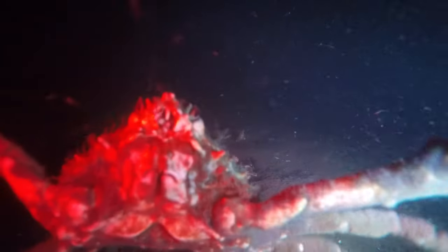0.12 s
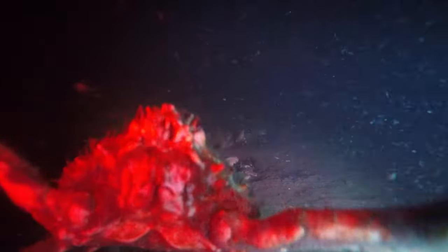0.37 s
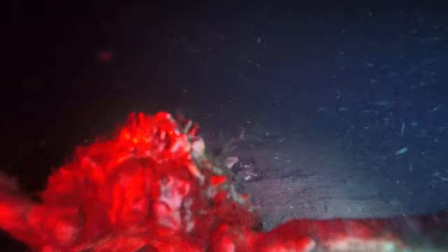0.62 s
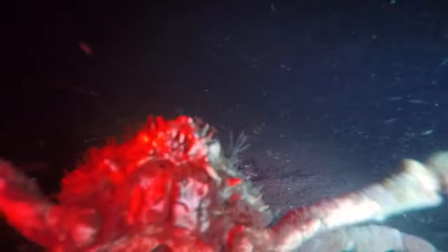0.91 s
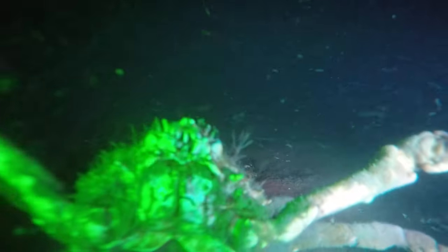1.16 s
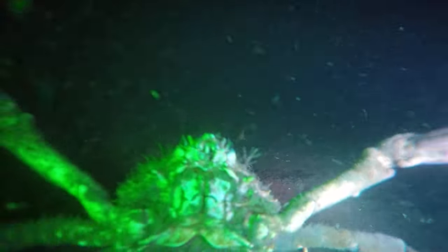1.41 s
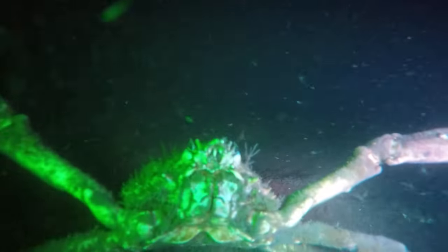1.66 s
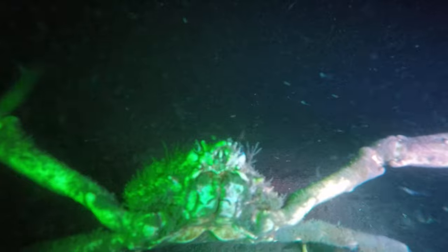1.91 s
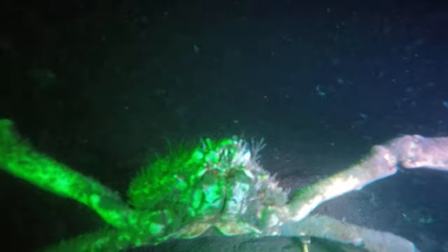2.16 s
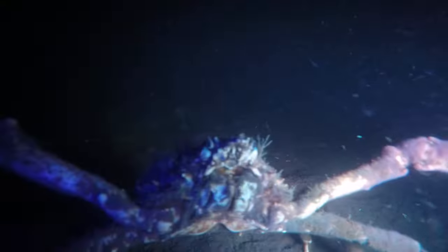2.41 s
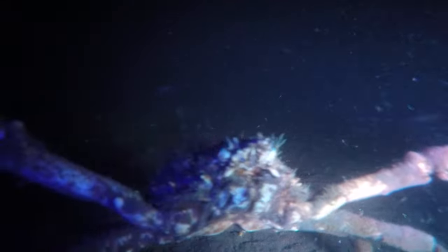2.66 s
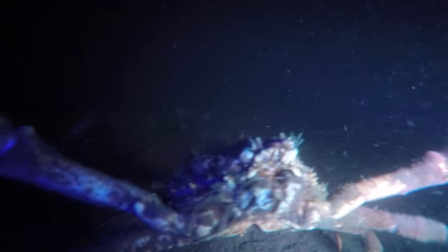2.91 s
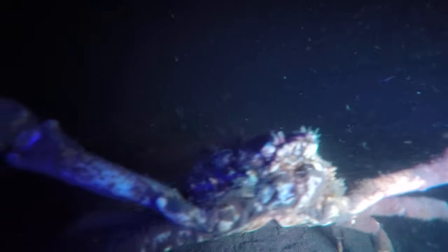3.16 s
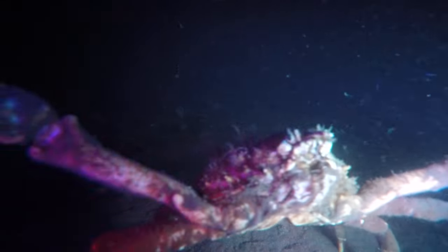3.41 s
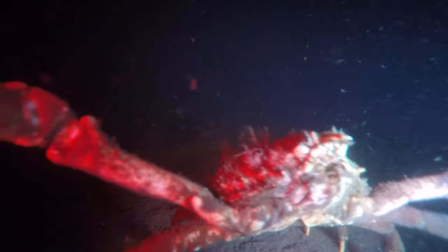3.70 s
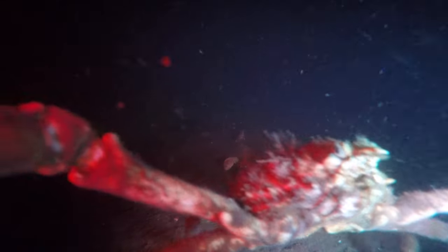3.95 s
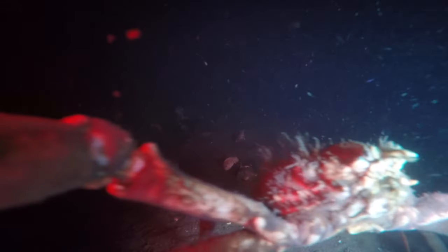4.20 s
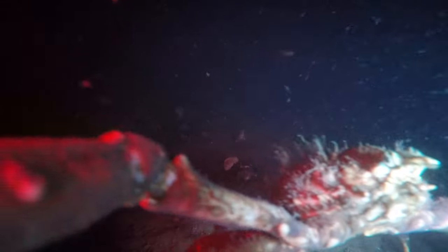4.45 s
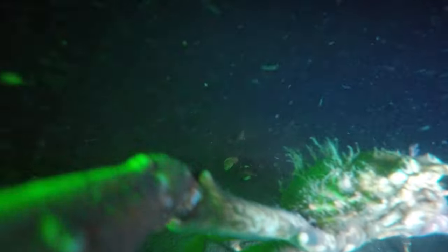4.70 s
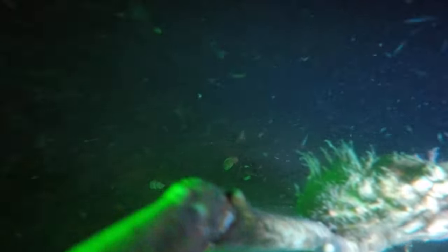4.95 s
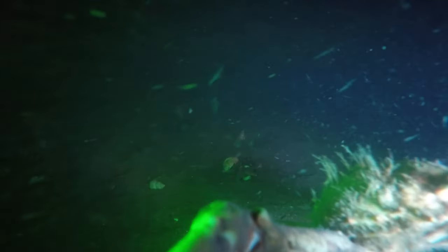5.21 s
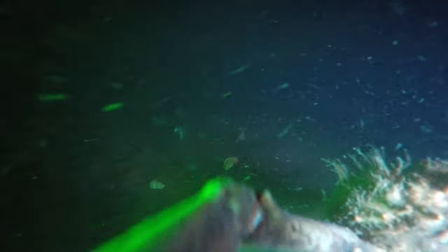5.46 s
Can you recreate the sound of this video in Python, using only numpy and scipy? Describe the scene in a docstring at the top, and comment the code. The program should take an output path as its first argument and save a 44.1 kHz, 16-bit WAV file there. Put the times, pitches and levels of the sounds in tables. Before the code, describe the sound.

The microphone sits inside a sealed underwater camera housing, so contacts are close, hard and boxy. Soft water hiss, low surge and a very faint mid-pitched hum run throughout, with two distant machines fluttering at about eighteen strokes a second: one thuds and wheezes, the other ticks. At 0.36 s a crab leg strikes loudly, clipping, followed by a short rattle, a low buzz around 200 Hz until 0.8 s and a slow swaying rumble. A weaker, dull bump comes at 0.65 s. From 1 to 5 s it is quiet: scattered tiny snaps and bubbles, faint very high squeaks between 1.3 and 3 s, thuds stronger from 1.9 to 3.85 s, ticks sharpening until 3.85 s, then fading out by about 4.2 s. At 5.12 s a sharp knock begins scraping and catching; heavy blows at 5.37 and 5.53 s, with crackling slips between, overload the microphone as it ends.

```python
"""A crab knocks and scrapes its legs on an underwater camera housing: bursts of contact ring its modes.
Each shove leaves the camera swaying in a low beat, and a shuddering leg buzzes in three harmonics.
Two far machines, resonances struck once a stroke, sound through filtered-noise hiss, surge and hum.
Small snaps are single dying modes, faint squeaks are gliding groups of three tones.
Hard knocks overload the microphone and duck its gain."""
import sys
import numpy as np
from scipy import signal
from scipy.fft import rfft, irfft
from scipy.io import wavfile
from scipy.ndimage import uniform_filter1d

SR = 44100
rng = np.random.default_rng(int(sys.argv[2]) if len(sys.argv) > 2 else 0)


def voltage_ratio(decibels):
    """Convert decibels (scalar or array-like) to amplitude ratios, 20 dB per decade."""
    exponent = np.asarray(decibels, float) / 20
    return 10 ** exponent


def generate_wav(sig):
    """Save sig (samples, or channels by samples) to the path in sys.argv[1] as 16-bit PCM at SR."""
    pcm = np.round(np.clip(np.atleast_2d(sig).T, -1, 1) * 32767).astype(np.int16)
    wavfile.write(sys.argv[1], SR, pcm)


N = 246519  # samples

# Colour of the water hiss: pitch_hz, density_db (per Hz, relative)
HISS_COLOUR = [(12, -42), (20, 4), (91, -2), (262, -17), (377, -10), (499, -25.5), (642, -7), (976, -22),
               (1220, -18.5), (1480, -20), (1660, -16.5), (2320, -22), (3200, -22), (7520, -31),
               (14300, -32.5), (16000, -40)]
HISS_DB, SURGE_DB = -57, -60.5
HUM_HZ, HUM_WIDTH_HZ, HUM_DB = 443, 9, -78

# Stroke timing of the thudding far machine: time_s, strokes_made (count so far)
THUD_STROKES = [(.02, 0), (.161, 2), (.215, 3), (.909, 17), (1.622, 31), (1.678, 32), (1.809, 34),
                (2.139, 38), (2.366, 41), (2.472, 43), (3.414, 62), (3.827, 70), (3.874, 71), (4.486, 83),
                (4.853, 90), (5.57, 103)]
# Load of the thudding machine, heard as the level of its thud: time_s, level_db
LOAD = [(0, -66), (.6, -64.5), (1.699, -64), (1.901, -58.5), (2.8, -58), (3.84, -58), (3.87, -64.5),
        (4.3, -64.5), (4.7, -61.5), (5.1, -60.5)]
BODY_HZ = 850  # upper ring of the thud
WHEEZE_DB, WHEEZE_DB_PER_LOAD_DB = -64, 2.1  # level at a load of -61 dB, and its growth with load
CLACK_DB, CLACK_DB_PER_S = -65, 3.5  # level at the start, and its growth
# Stroke timing of the ticking far machine: time_s, strokes_made (count so far)
TICK_STROKES = [(.022, 0), (.163, 2), (.219, 3), (1.013, 19), (1.421, 27), (1.628, 31), (1.95, 37),
                (2.3, 43), (2.887, 52), (2.943, 53), (3.523, 64), (3.858, 70), (4.067, 74), (4.23, 77)]
# Tone of the ticking machine: time_s, level_db (scale of the strongest tick), pitch_hz
TICK_TONE = [(0, -47, 1926), (1, -46.5, 1910), (1.95, -45, 1880), (2.62, -42.5, 1712), (3.84, -40, 1713),
             (4.25, -52.5, 1740)]

# Hard blows of a leg: start_s, level_db (9 dB over the rms of the first 9 ms), contact_ms,
# low_db (lift of the low modes), high_db (lift of the modes near 2.3 kHz, more above)
BLOWS = [(.3578, 9.5, 7.2, 2, 1.5), (.6535, -11.5, 3.1, 18, 8), (5.117, -1, 2.86, 0.5, 4),
         (5.3696, 7, 3.8, -7, 6.5), (5.532, 10, 2, -3.5, 11.5)]
# A dragged claw catches and lets go: start_s, level_db (as for blows), low_db (lift of the low modes)
CLAW_SLIPS = [(5.149, -25, 4.5), (5.195, -43, 0), (5.227, -38, 8), (5.281, -34, -4), (5.297, -28.5, 6),
              (5.31, -26, -2), (5.32, -34, -1), (5.331, -28.5, -6), (5.344, -32, -10), (5.356, -36, -9),
              (5.387, -14, 5), (5.427, -19, 1), (5.4319, -5, -2), (5.4559, -2.5, -11), (5.4679, -6, 2),
              (5.4838, -3, -9), (5.4955, -3, -1), (5.553, -14.5, -14)]
SLIP_MS, SLIP_HIGH_DB, SLIP_HIGH_PER_DB = 3.2, -10, -0.08  # strong slips are duller
# Ringing modes of the housing: pitch_hz, level_db (relative), t60_s
HOUSING_MODES = [(370.7, -19, 0.11), (449, -11, 0.067), (574, -18, 0.021), (678, -0.5, 0.04),
                 (724, -2, 0.028), (1066.7, -7.5, 0.018), (1440.6, 0, 0.016), (1575, -0.5, 0.018),
                 (1777, -6.5, 0.022), (1975, 7, 0.0067), (2538, 0, 0.012), (2776, -1.5, 0.0093),
                 (3240, -21.5, 0.011), (3596, -7.5, 0.0079), (4620, -19.5, 0.006), (5670, -29.5, .01),
                 (7000, -27.5, 0.0036), (9200, -28, 0.0027), (12600, -37, .005)]
# The whole camera rocking on its mount: pitch_hz, level_db (relative), t60_s
MOUNT_MODES = [(98.9, 0, 0.079), (133.4, -3.5, 0.011)]
# The air inside the camera: pitch_hz, level_db (relative), t60_s
AIR_MODES = [(246.3, -6.5, 0.098), (200, -13, 0.029)]
# Thump of mount and air: dB relative to a 3 ms blow, dB per doubling of contact, dB per dB of low modes
THUMP_DB, THUMP_DB_PER_DOUBLING, THUMP_PER_LOW = -13.5, 5.5, .2
AIR_DB, AIR_DB_PER_DOUBLING = -28, 9

# Shoves that set the camera swaying: start_s, level_db (added to that of each mode)
SHOVES = [(.36, -26.5), (5.129, -31.5), (5.37, -20), (5.535, -20)]
# Modes of the sway: level_db (relative), t60_s
SWAY_MODES = [(-10, 4.6), (-8.5, 5), (6.5, 1.2), (7.5, .15)]
# Pitches of those modes, in the same order: pitch_hz
SWAY_PITCHES = [23.6, 27.75, 21, 36]

# Legs rattling on after a bump: start_s, length_s, level_db (before the fade),
# low_db (weight of the low modes), rumble_db (before the fade)
RATTLES = [(.37, 0.12, -31.5, 9.5, -22), (.66, 0.055, -40, 19.5, -49), (.795, .105, -38, 19, -48),
           (5.125, 0.07, -38, 6, -25.5), (5.376, .045, -24, 10, -11.5), (5.537, 0.038, -13.5, 4, -9.5)]
# Legs dragging while pressed on: same columns, levels before the swell
DRAGS = [(5.145, 0.099, -51, 2, -48.5), (5.249, .12, -50, 2, -54.5), (5.385, 0.1235, -32, 2, -38)]
RATTLE_FADE_DB, RATTLE_BEND, TREBLE_FADE_DB = -35.5, 1.7, -15  # the treble of a rattle dies sooner
DRAG_GROWTH_DB, DRAG_EDGES = 6.5, 0.31  # swell over a drag, share of it spent fading in and out
GRAINS_PER_S = 1500

# A leg shudders against the housing: time_s, pitch_hz, level_db (added to that of each harmonic)
SHUDDER = [(0.401, 200, -39), (.48, 193.8, -35.5), (0.538, 209.2, -40.5), (0.699, 201.8, -42),
           (0.777, 207, -42), (.795, 203, -44)]
# Harmonics of the shudder from the first up: level_db (relative)
SHUDDER_HARMONICS = [-1.5, -12, -20.5]

# Small snaps and bubbles in the water: start_s, level_db (before fade-in and decay), pitch_hz, t60_s
WATER_SNAPS = [(0.749, -40.5, 1847, 0.048), (3.925, -50, 11400, 0.0055), (4.6, -48, 11500, 0.005),
               (1.372, -40, 2990, 0.014), (1.59, -55, 10700, 0.022), (2.052, -42.5, 344, 0.045),
               (2.197, -46, 2390, 0.021), (2.399, -41.5, 1545, 0.074), (2.509, -46, 1450, 0.059),
               (2.977, -48, 2830, 0.022), (3.435, -51.5, 3730, 0.018), (3.437, -44, 8500, .003),
               (3.7, -57.5, 3720, .02), (4.039, -50.5, 376, 0.08), (4.784, -47.5, 1970, 0.049)]
# Faint high squeaks: start_s, length_s, glide_hz (whole span), level_db (lowest tone)
SQUEAK_GLIDES = [(1.35, 0.069, 246.5, -80), (1.5, 0.11, 391, -75), (1.812, 0.11, 3, -75.5),
                 (1.98, 0.11, 398, -74.5), (2.323, 0.093, 305, -75.5), (2.48, .08, 98, -75),
                 (2.8, 0.11, -9, -76.5), (2.96, .07, 0, -77)]
SQUEAK_HZ, SQUEAK_STEP_HZ, SQUEAK_LEAD = 10820, 535, .4  # a glide starts this share of its span below


def evened(x):
    """Scales to rms 1."""
    return x / np.sqrt(np.mean(x ** 2) + 1e-20)


def add(mix, s, sound):
    """Mixes a sound in at s seconds."""
    part = mix[round(s * SR):][:len(sound)]
    part += sound[:len(part)]


def ring(modes, length=.25):
    """Impulse response of a set of dying modes, each taking part of a cycle to swing up."""
    t = np.arange(round(length * SR)) / SR
    out = np.zeros(len(t))
    for hz, db, t60 in modes:
        swing_up = 1 - np.exp(-(1.27 * hz * t) ** 2)
        out += voltage_ratio(db - 60 * t / t60) * np.sin(2 * np.pi * hz * t) * swing_up
    return out


def resonate(x, hz, width):
    """A resonance of gain 1, width in Hz, whose pitch may move."""
    turn = np.exp(2j * np.pi * np.cumsum(hz * np.ones(len(x))) / SR)
    r = np.exp(-np.pi * width / SR)
    return 2 * (turn * signal.lfilter([1 - r], [1, -r], x / turn)).real


def hiss():
    """Hiss of sea and microphone: noise shaped in frequency, with slightly uneven patches."""
    frames, hz = N // 256 + 5, np.fft.rfftfreq(1024, 1 / SR)
    real, imaginary, patches = rng.standard_normal((frames, 513, 3)).T
    patches = evened(uniform_filter1d(uniform_filter1d(patches, 10, 0), 8, 1))
    f, db = np.transpose(HISS_COLOUR)
    colour_db = np.interp(np.log(hz + 1), np.log(f + 1), db)[:, None]
    spectrum = (real + 1j * imaginary) * voltage_ratio(colour_db + 1.3 * patches)
    noise = signal.istft(spectrum, nperseg=1024, noverlap=768)[1][:N]
    return evened(noise) * voltage_ratio(HISS_DB)


def surge():
    """Slow surge of the water: noise through two very low resonances."""
    slow = resonate(resonate(rng.standard_normal(N), 27, 17), 24, 20)
    return evened(slow) * voltage_ratio(SURGE_DB)


def hum():
    """Faint hum: noise through two narrow resonances on one pitch."""
    tone = resonate(resonate(rng.standard_normal(N), HUM_HZ, HUM_WIDTH_HZ), HUM_HZ, 30)
    return evened(tone) * voltage_ratio(HUM_DB)


def strokes(timing, rows):
    """One impulse a stroke, a little uneven in strength, and the curves of the other columns."""
    s, made = np.transpose(timing)
    at = np.interp(np.arange(made[-1]), made, s)
    train = np.zeros(N)
    train[(at * SR).astype(int)] = voltage_ratio(rng.standard_normal(len(at)))
    s, *columns = np.transpose(rows)
    return train, *(np.interp(np.arange(N) / SR, s, c) for c in columns)


def thudding_machine():
    """Each stroke thuds through low resonances, wheezes as a puff of noise and clacks."""
    t = np.arange(3000) / SR
    train, thud_db = strokes(THUD_STROKES, LOAD)
    wheeze_db = WHEEZE_DB + WHEEZE_DB_PER_LOAD_DB * (thud_db + 61)
    clack_db = CLACK_DB + CLACK_DB_PER_S * np.arange(N) / SR
    early = np.roll(train, -330)  # 7.5 ms ahead of the stroke mark
    kick = signal.oaconvolve(early, t / .003 * np.exp(1 - t / .003))[:N]
    puff = signal.oaconvolve(early, np.minimum(t / 0.0046, 1) * np.exp(-(t / 0.02) ** 2))[:N]
    noise = rng.standard_normal((3, N))
    blow = evened(np.roll(train, -220)) + .5 * evened((kick + .15) * noise[0])
    thud = evened(resonate(resonate(resonate(blow, 648, 46), 655, 180), 655, 240))
    rough_blow = blow + 3.5 * evened(blow * noise[1])
    thud += 0.19 * evened(resonate(resonate(rough_blow, BODY_HZ, 140), BODY_HZ, 250))
    breath = (puff + 0.28) * noise[2]  # a steady noise stays between the puffs
    wheeze = evened(resonate(resonate(resonate(breath, 1680, 600), 1600, 620), 1800, 1000))
    clack = resonate(resonate(np.roll(train, 480), 1730, 158.6), 1730, 260)  # shortly after the thud
    clack /= abs(clack).max()
    return voltage_ratio(thud_db) * thud + voltage_ratio(wheeze_db) * wheeze + voltage_ratio(clack_db) * clack


def ticking_machine():
    """Sharp ticks: stroke impulses through two resonances of drifting pitch."""
    train, tick_db, tick_hz = strokes(TICK_STROKES, TICK_TONE)
    pair = train + 0.21 * np.roll(train, -330)  # a weaker tick leads each one
    tick = resonate(resonate(np.roll(pair, -40), tick_hz, 280), tick_hz, 420)
    return voltage_ratio(tick_db) * tick / abs(tick).max()


def knocks():
    """A short chatter of contacts rings the housing; the push rocks the mount and the air inside."""
    out, ms_axis = np.zeros(N), np.arange(1500) / SR * 1000
    push = signal.windows.hann(220)  # the push lasts about 5 ms
    rock, boom = (-signal.fftconvolve(push, ring(modes)) for modes in (MOUNT_MODES, AIR_MODES))
    slips = [(s, db, SLIP_MS, low_db, SLIP_HIGH_DB + SLIP_HIGH_PER_DB * db)
             for s, db, low_db in CLAW_SLIPS]
    for s, db, ms, low_db, high_db in list(BLOWS) + slips:
        # long, blunt contacts rock the mount and the air more
        doublings = np.log2(ms / 3)
        thump_db = THUMP_DB + THUMP_DB_PER_DOUBLING * doublings + THUMP_PER_LOW * low_db
        air_db = AIR_DB + AIR_DB_PER_DOUBLING * doublings
        contact = rng.standard_normal(1500) * np.exp(-(ms_axis / ms) ** 2)
        contact[0] += 4.  # first touch
        spread = rfft(contact)  # the chatter reaches every mode about equally
        spread /= np.sqrt(uniform_filter1d(abs(spread) ** 2, size=7))
        contact = irfft(spread) * np.exp(-(ms_axis / (1.4 * ms)) ** 4)
        # where and how sharply the leg lands decides which modes it wakes
        octaves = [-0.21, -0.08, 0.5, 0.5, 0.48, 1.5, 5.5]  # from 800 Hz
        lift_db = [2.4 * low_db - 13, low_db, low_db, 0, 0, high_db, 2.0 * high_db]
        shell = [(hz, d + np.interp(np.log2(hz / 800), octaves, lift_db), t60)
                 for hz, d, t60 in HOUSING_MODES]
        rung = signal.fftconvolve(contact, ring(shell, .1))
        add(out, s, voltage_ratio(db - 9) * rung / rung[:400].std())
        add(out, s + 0.003, voltage_ratio(db + thump_db) * rock / abs(rock).max())
        add(out, s + 0.0011, voltage_ratio(db + air_db) * boom / abs(boom).max())
    return out


def sway():
    """Each shove thumps and leaves close low modes beating."""
    out = np.zeros(N)
    modes = [(hz, *row) for hz, row in zip(SWAY_PITCHES, SWAY_MODES)]
    for s, db in SHOVES:
        add(out, s, voltage_ratio(db) * ring(modes, 4.4))
    return out


def scrapes():
    """Dense small slips ring the housing and shake mount and air; rattles die away, drags swell."""
    out = np.zeros(N)
    edges_hz = [0, 600, 900, SR]
    bodies = [ring([m for m in HOUSING_MODES if lo < m[0] < hi], .1)
              for lo, hi in zip(edges_hz, edges_hz[1:])]
    soft = signal.butter(6, 800, fs=SR)  # takes the treble off the low modes
    bodies[:2] = [signal.lfilter(*soft, body) for body in bodies[:2]]
    bodies.append(ring(list(MOUNT_MODES[:1]) + list(AIR_MODES[:1])))
    for k, (s, length, db, low_db, rumble_db) in enumerate(list(RATTLES) + list(DRAGS)):
        t = np.linspace(0, 1, round(length * SR))  # share of the scrape
        rattling = k < len(RATTLES)
        if rattling:
            shape = voltage_ratio(RATTLE_FADE_DB * t ** RATTLE_BEND) * signal.windows.tukey(len(t), .04)
        else:
            shape = voltage_ratio(DRAG_GROWTH_DB * t) * signal.windows.tukey(len(t), DRAG_EDGES)
        sizes = voltage_ratio(4 * np.minimum(rng.exponential(1, len(t)), 3))
        happens = rng.random(len(t)) < GRAINS_PER_S / SR
        slips = sizes * rng.choice([-1, 1], len(t)) * happens
        deep, low, high, rumble = (evened(signal.fftconvolve(slips, body)[:len(t)]) for body in bodies)
        blunt = voltage_ratio(low_db)  # a blunt drag wakes the low modes, a very blunt one the deepest too
        low = (low + deep * 1.7 * np.tanh((blunt / 8.) ** 2)) * blunt
        high = high * voltage_ratio(TREBLE_FADE_DB * t * rattling)
        grind = voltage_ratio(db) * (low + high) / np.sqrt(1 + blunt ** 2)
        add(out, s, (grind + voltage_ratio(rumble_db) * rumble) * shape)
    return out


def buzz():
    """A shuddering leg: three harmonics that follow one wandering pitch and level."""
    s, hz, level_db = np.transpose(SHUDDER)
    t = np.arange(s[0], s[-1], 1 / SR)
    turns, out = np.cumsum(np.interp(t, s, hz)) / SR, np.zeros(N)
    for k, db in enumerate(SHUDDER_HARMONICS, 1):
        level = np.sqrt(2) * voltage_ratio(np.interp(t, s, level_db) + db)  # the dB are rms
        add(out, s[0], level * np.sin(2 * np.pi * k * turns))
    return out


def snaps():
    """Snaps and bubbles: one dying mode each, with a short fade-in."""
    out = np.zeros(N)
    for s, db, hz, t60 in WATER_SNAPS:
        fade_in = np.minimum(np.arange(round(.1 * SR)) / (t60 * 1500), 1)
        add(out, s, ring([(hz, db, t60)], .1) * fade_in)
    return out


def squeaks():
    """Three evenly spaced tones glide together, slowing towards the end."""
    out = np.zeros(N)
    for s, length, glide_hz, db in SQUEAK_GLIDES:
        u = np.linspace(0, 1, round(length * SR))
        path = SQUEAK_HZ + glide_hz * (np.sin(np.pi / 2 * u) - SQUEAK_LEAD)
        tones = np.zeros(len(u))
        for k in range(3):
            turns = np.cumsum(path + k * SQUEAK_STEP_HZ) / SR
            tones += np.sin(2 * np.pi * turns) / (1 + 0.17 * k)
        add(out, s, voltage_ratio(db) * tones * signal.windows.tukey(len(u), .3))
    return out


def scene():
    """Everything reaches one microphone inside the housing."""
    background = hiss() + surge() + hum() + thudding_machine() + ticking_machine()
    crab = knocks() + sway() + scrapes() + buzz()
    return (background + crab + snaps() + squeaks())[None]


def low_pass(x):
    """Removes everything above the highest recorded frequency."""
    return signal.sosfilt(signal.butter(12, 16590, fs=SR, output="sos"), x)


def record(dry):
    """Gain control falls after loud knocks and creeps back; the input clips."""
    power_db = 10 * np.log10(signal.lfilter([.001], [1, -.999], dry[0] ** 2) + 1e-12)
    fall = np.arange(N) * 14. / SR  # recovery of 14 dB a second
    wanted_db = np.maximum(power_db + 21.5, 0) * 0.6  # acts above -21.5 dB
    cut_db = np.maximum(np.maximum.accumulate(wanted_db + fall) - fall, 0)
    late_cut_db = signal.lfilter([.002], [1, -.998], cut_db)  # takes about 11 ms to act
    x = dry * voltage_ratio(-late_cut_db)
    clipped = 0.88 * np.tanh((abs(x) / 0.89) ** 3) ** (1 / 3) * np.sign(x)
    return low_pass(clipped)


dry = scene()
out = record(dry)
generate_wav(out)
```